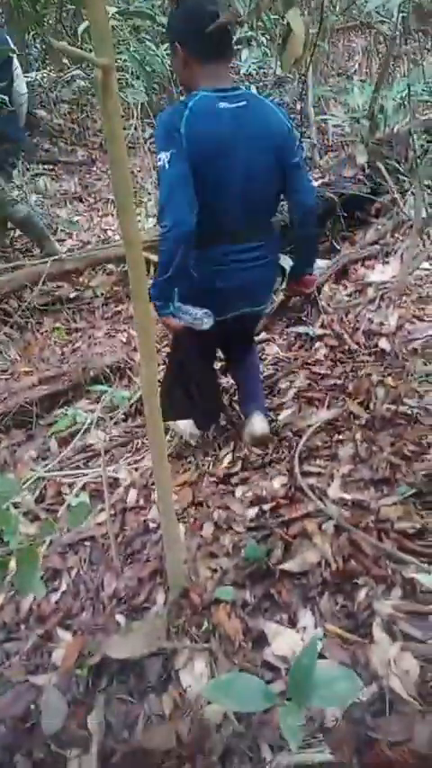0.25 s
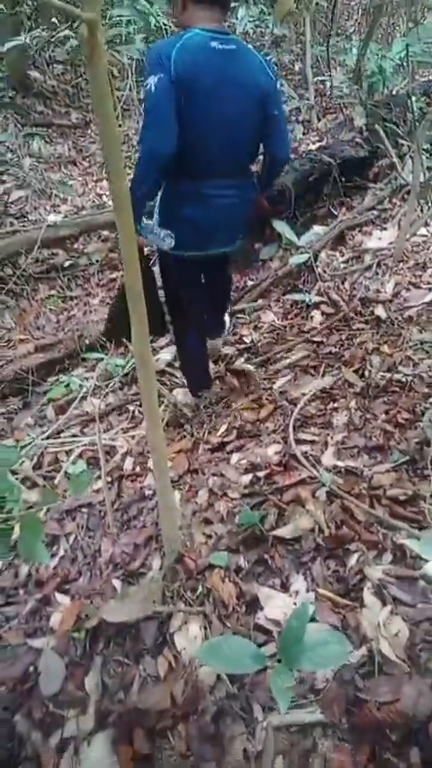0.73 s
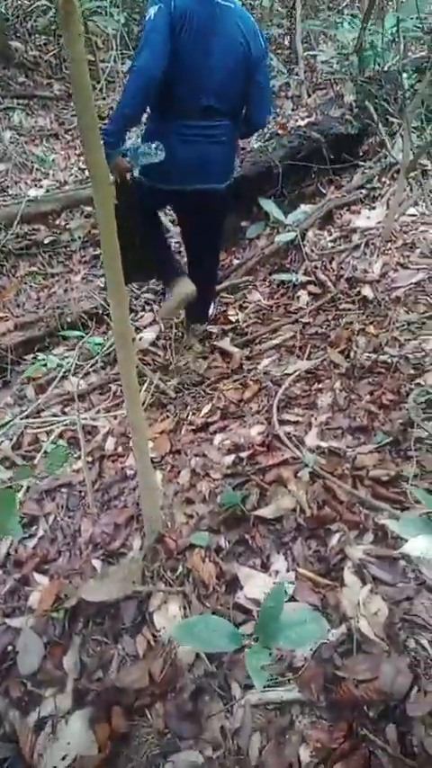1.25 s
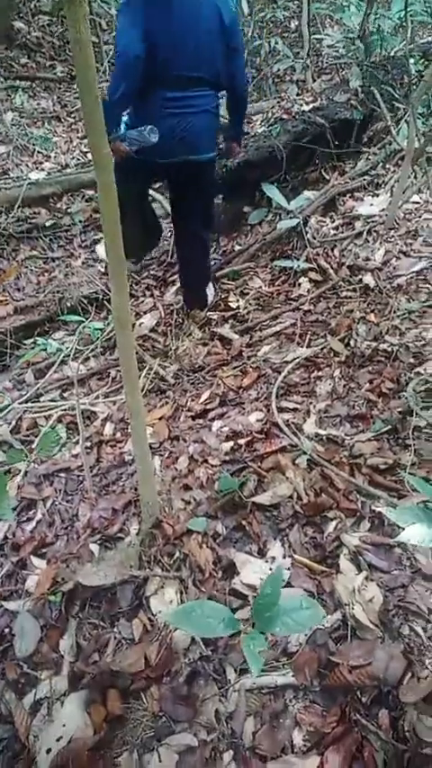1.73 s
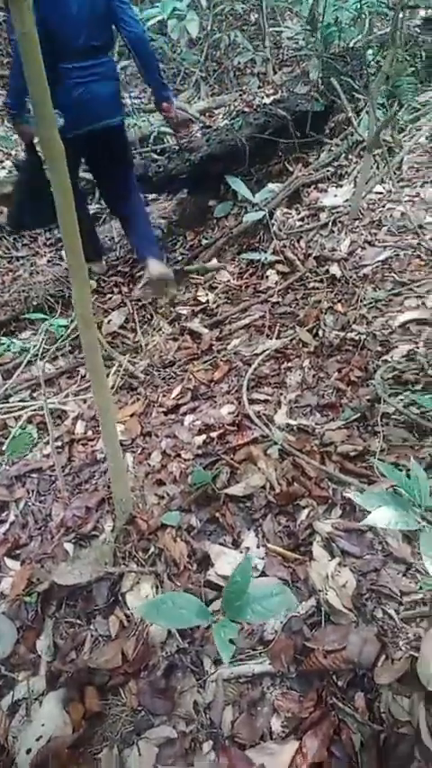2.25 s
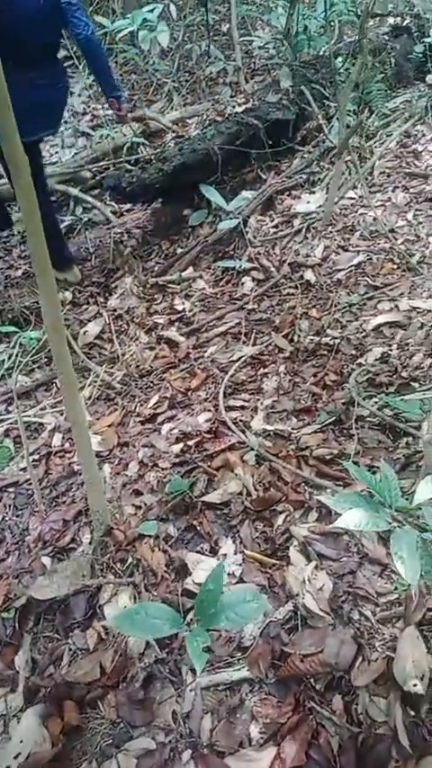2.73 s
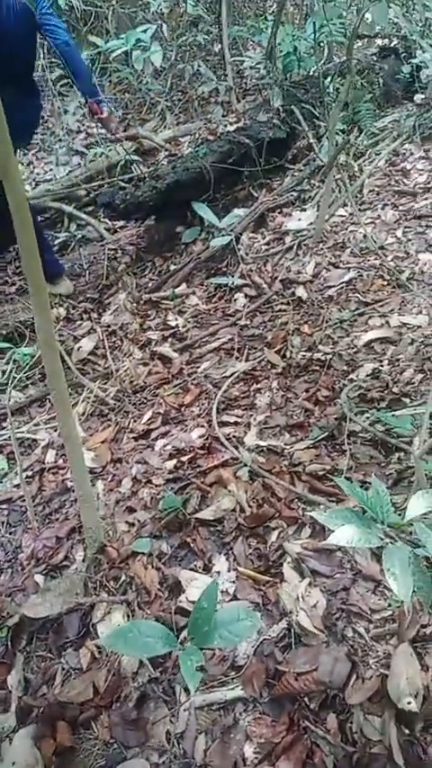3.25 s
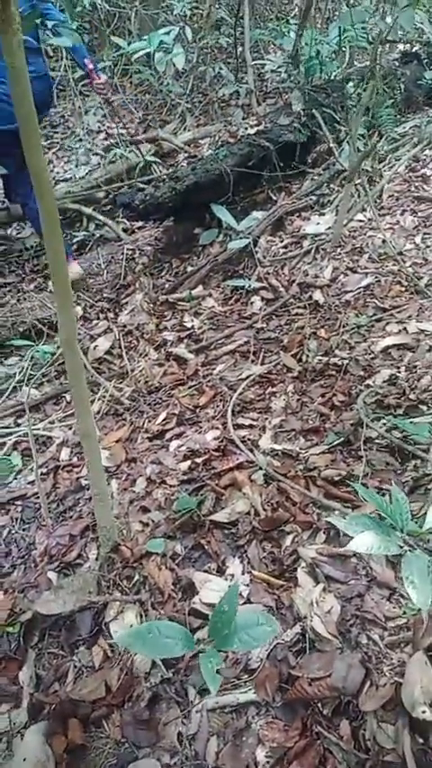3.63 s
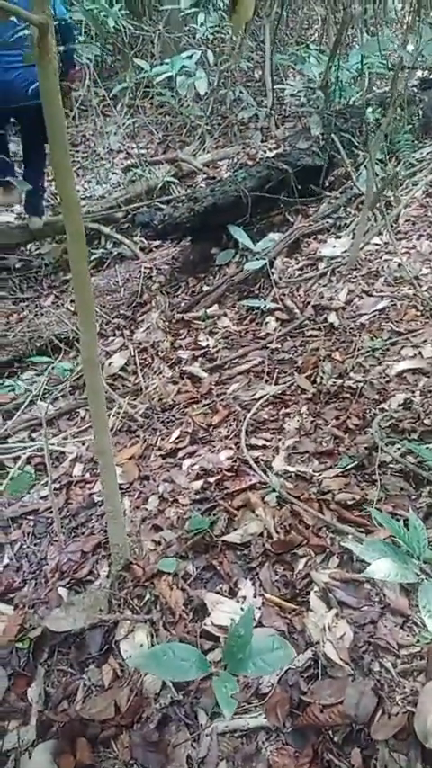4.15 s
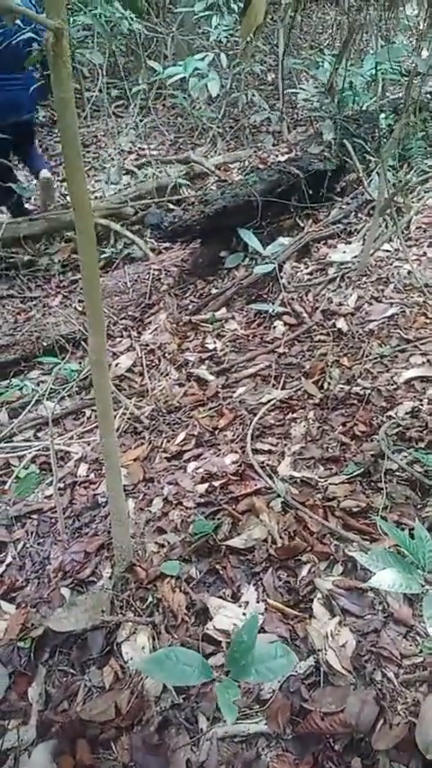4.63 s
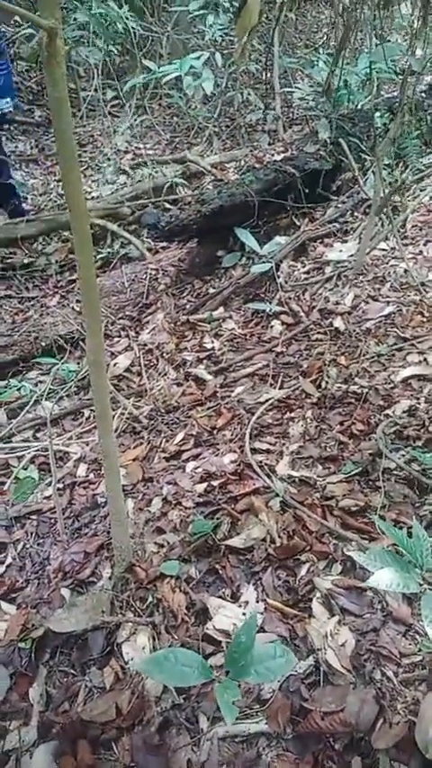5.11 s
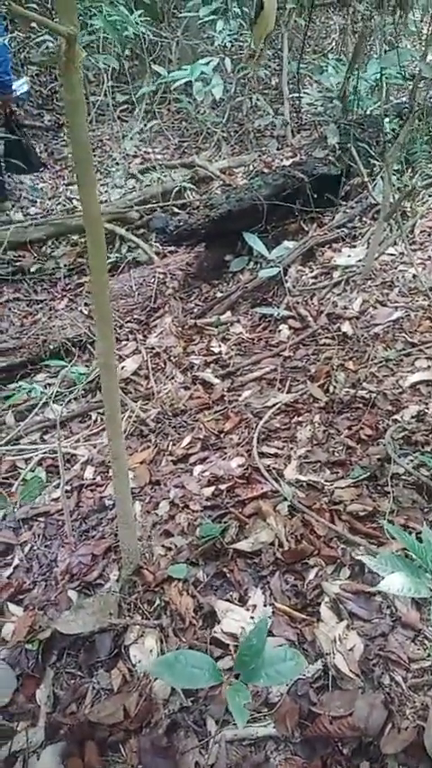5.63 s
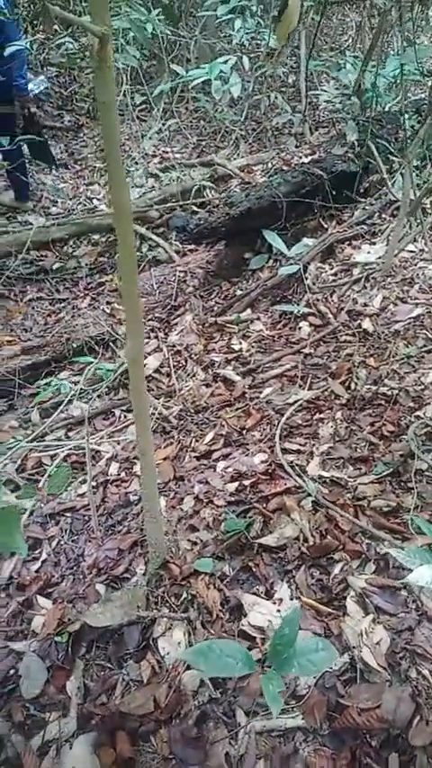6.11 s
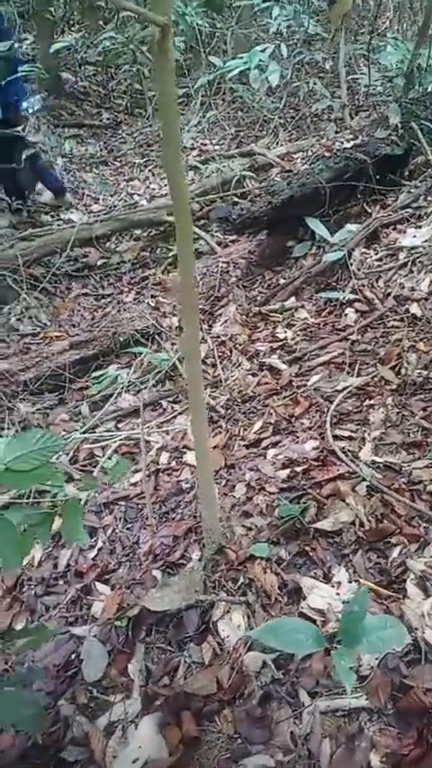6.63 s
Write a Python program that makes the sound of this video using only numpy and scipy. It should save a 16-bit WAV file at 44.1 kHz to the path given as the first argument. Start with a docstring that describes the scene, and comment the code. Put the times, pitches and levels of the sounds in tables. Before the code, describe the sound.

A walker treads dry leaf litter close by, crackling and snapping twigs in the first second, with a low heel thud and crunch soon after. Steps grow sparser and softer as the person moves away among the trees. Two crickets trill high and continuously over distant insects, joined by a gliding whistle and a brief rasp. Handheld outdoor microphone, light woodland echoes.

```python
"""Footsteps in a forest of crickets

Walkers tread dry leaf litter: pressed leaves crackle as dense noise cracks, twigs snap as ringing bursts,
heels thud as sinking low tones, dragged sticks scrape a narrow resonance and a slipping branch creaks once.
Two crickets trill as chopped tones over shaped-noise insects; others whistle in gliding tones or rasp.
Scattered echoes from the trees follow the steps and the trills; patchy treble noise widens the stereo."""
import sys
import numpy as np
from scipy import signal
from scipy.fft import rfft, irfft
from scipy.io import wavfile
from scipy.ndimage import uniform_filter1d

SR = 44100
rng = np.random.default_rng(int(sys.argv[2]) if len(sys.argv) > 2 else 0)


def output_pcm(signal):
    """Save a mono or channel-first signal as 16-bit PCM at the path in sys.argv[1].

    Samples are clipped to [-1, 1] before scaling.
    """
    pcm = np.clip(np.atleast_2d(signal).T, -1, 1) * 32767
    wavfile.write(sys.argv[1], SR, np.round(pcm).astype(np.int16))


N = 302967

# tone colour of dry leaf litter: (frequency [Hz], relative level [dB])
LITTER_COLOUR = [(100, -65.5), (170, -28), (316, -33.5), (408, -30), (862, -20.5), (1390, -20.5),
                 (1600, -12.5), (1760, -20), (2440, -0.5), (3780, -1), (7020, -9.5), (9400, -39),
                 (13300, -27.5)]


def gain_of(db):
    """Amplitude factor of a level in dB."""
    return 10 ** (np.asarray(db) / 20)


def evened(x):
    """Scales a sound to rms 1."""
    return x / np.sqrt(np.mean(x ** 2) + 1e-20)


def read(points, hz):
    """Reads a (frequency, value) curve at hz, along log frequency."""
    f, value = np.transpose(points)
    return np.interp(np.log(hz + 1), np.log(f + 1), value)


def follow(rows, t):
    """Columns of a (time, values) curve table at the times t."""
    s, *columns = np.transpose(rows)
    return [np.interp(t, s, c) for c in columns]


def add(mix, s, sound):
    """Lays a sound into the mix from s seconds on."""
    part = mix[round(s * SR):][:len(sound)]
    part += sound[:len(part)]


def resonate(x, hz, width):
    """A resonance: shifts hz (fixed or gliding) down to zero, smooths, and shifts back."""
    turn = np.exp(2j * np.pi * np.cumsum(hz * np.ones(len(x))) / SR)
    r = np.exp(-np.pi * width / SR)
    smooth = signal.lfilter([1 - r], [1, -r], x / turn + 1e-18)
    return 2 * (turn * smooth).real


def narrow_noise(count, hz, width):
    """Noise through the same resonance three times, rms 1."""
    band = rng.standard_normal(count)
    for _ in range(3):
        band = resonate(band, hz, width)
    return evened(band)


def wander(per_s, count=N):
    """Random drift around zero that turns about per_s times a second, from knots evened to rms 1."""
    knots = rng.standard_normal(int(N / SR * 60) + 2)
    knots = evened(uniform_filter1d(knots, max(1, round(60 / per_s))))
    return np.interp(np.arange(count) / SR * 60, np.arange(len(knots)), knots)


def patches(shape, size):
    """Random blobs over frequency and time, rms 1."""
    across_hz = uniform_filter1d(rng.standard_normal(shape), size[0], 0)
    return evened(uniform_filter1d(across_hz, size[1], 1))


def leaves():
    """Dense cracks of uneven size; each footfall presses them louder and colours them deep or fine."""
    # footfalls: (full weight [s], press down [s], ease off [s], pressure [dB],
    #             deep crush [dB, -13.5 is neutral], fine rustle [dB, -22 is neutral])
    steps = [(.07, 0.2, 0.44, -30.5, -3.5, -12.5), (.17, 0.075, 0.34, -31.5, 5, -9.5),
             (0.254, 0.048, 0.2, -26, 3, -13), (.73, 0.048, 0.57, -34, -9.5, -13),
             (.85, 0.048, 0.042, -28.5, -15, -8), (.98, 0.085, 0.04, -42.5, -12, -1),
             (1.15, 0.22, .3, -39, -11, -13.5), (1.235, 0.049, .12, -33.5, -6.5, -11),
             (1.68, 0.025, 0.033, -26.5, 2, -10), (2.094, 0.03, 0.34, -31, -1, -16),
             (2.2, 0.13, 0.09, -36.5, -18, -10), (2.64, 0.3, 0.14, -47, -25, -11.5),
             (2.97, 0.079, 0.3, -39, -1, -15), (3.029, 0.11, 0.1, -37.5, 1.5, -7.5),
             (3.9, 0.26, 0.38, -47, -4, -12), (4.12, .16, 0.11, -39, -11, -13.5),
             (4.199, 0.023, 0.026, -39.5, -15, -40), (4.5, 0.048, 0.16, -28.5, -1, -12),
             (4.78, 0.1, 0.091, -46, -6.5, -4.5), (4.992, 0.073, 0.13, -37, 1.5, -7),
             (5.15, .05, 0.12, -46, 2.5, -1.5), (5.6, 0.033, 0.092, -55, -22.5, 11),
             (6.07, 0.041, 0.073, -46, -8, -19), (6.369, 0.1, 0.41, -54, 3, -4),
             (6.475, .025, 0.23, -38, -2.5, -5), (6.72, 0.2, 0.35, -42, 1, -8.5),
             (6.85, 0.14, .3, -43.5, 5, -13)]
    # the litter never quite rests: pressure, deep crush and fine rustle [dB, as above]
    stir = (-63.5, -19, -5.5)
    press_db = 20  # a step swells and fades by this much over its times
    deep_haste = 1.99  # the deep crush comes and goes this many times as fast

    crack_sizes = gain_of(3.5 * np.minimum(rng.exponential(1, N), 4))
    cracks_now = crack_sizes * (rng.random(N) < 1500 / SR)  # about 1500 cracks per s
    drive = evened(cracks_now * rng.choice([-1., 1.], N)) + 0.98 * rng.standard_normal(N)
    drive = drive * gain_of(2.1 * wander(45.))  # cracks come in clumps
    hz, t, z = signal.stft(drive, SR, nperseg=512, noverlap=384)
    deep = np.clip(np.log(2300 / (hz + 1)) / 0.5, 0, 1)[:, None]
    fine = np.clip(np.log((hz + 1) / 5000) / 0.64, 0, 1)[:, None]

    def power(db, deep_db, fine_db):
        """Power over frequency and time of one press on the leaves."""
        return gain_of(deep * (deep_db + 13.5) + fine * (fine_db + 22)) ** 2 * gain_of(db) ** 2

    weight = power(*stir) * np.ones(len(t))
    for s, press, ease, db, deep_db, fine_db in steps:
        away = np.where(t < s, (s - t) / press, (t - s) / ease)
        deep_now = deep_db - press_db * (deep_haste - 1) * away
        weight = weight + power(db - press_db * away, deep_now, fine_db)
    # narrow random streaks, about a tenth of a second long, colour the noise
    colour_db = read(LITTER_COLOUR, hz)[:, None] + 4.5 * patches(z.shape, size=(2, 28))
    return signal.istft(z * gain_of(colour_db) * np.sqrt(weight), SR, nperseg=512, noverlap=384)[1][:N]


def chorus():
    """Far insects and air blur into patchy noise."""
    # tone colour of the chorus: (frequency [Hz], relative level [dB])
    chorus_colour = [(40, -13), (170, -22.5), (490, -25.5), (1750, -20), (1950, -8.5), (2300, -10),
                     (4040, -12.5), (4900, -24), (6100, -28), (7800, -19), (9500, -20.5), (11300, -35),
                     (12300, -34.5), (13000, -25.5)]
    chorus_db = -61
    hz, t, z = signal.stft(rng.standard_normal(N), SR, nperseg=1024, noverlap=768)
    narrow = 2.8 * patches(z.shape, size=(4, 20))
    broad = 2.4 * patches(z.shape, size=(60, 6))
    z = z * gain_of(read(chorus_colour, hz)[:, None] + narrow + broad)
    return gain_of(chorus_db) * evened(signal.istft(z, SR, nperseg=1024, noverlap=768)[1][:N])


def crickets():
    """Each wing tone is chopped into even strokes, which spreads it into a comb of lines."""
    # wing tones of two near crickets: (time [s], higher one [Hz], lower one [Hz])
    wings = [(0, 5615, 5445), (1.0, 5612, 5445), (1.7, 5599, 5430), (3.1, 5611, 5434), (5.3, 5627, 5490),
             (6.87, 5629, 5507)]
    # strokes quicken with the tone: (wing tone [Hz], stroke rate there [per s], added rate [per s per Hz])
    stroke_rates = [(5615, 58, .4), (5460, 60.5, .02)]
    # trill levels before blend and mix: (time [s], higher one [dB], lower one [dB])
    trill = [(0, -52, -48), (.6, -51, -54), (1.3, -48.5, -55.5), (1.7, -49, -48), (2.1, -51, -55.5),
             (2.35, -47, -48.5), (2.8, -52, -53.5), (3.2, -57, -48), (3.7, -47.5, -61), (4.3, -53, -55.5),
             (4.65, -48.5, -52.5), (5.4, -49.5, -55), (6.2, -54.5, -52.5), (6.87, -54, -52)]
    t, song = np.arange(N) / SR, 0
    # the strokes favour the lines above the wing tone by the share lean
    for hz, (at_hz, rate, slope), db, lean in zip(follow(wings, t), stroke_rates, follow(trill, t), (.8, .2)):
        strokes = rate + slope * (hz - at_hz)
        turn = 2 * np.pi * (np.cumsum(strokes + 0.313 * wander(1.28)) / SR + rng.random())
        wing = 2 * np.pi * np.cumsum(hz + 3.01 * wander(2.28)) / SR
        stroke_shape = np.exp(1.5 * (np.cos(turn) + 1j * lean * np.sin(turn)))
        near = evened((stroke_shape * np.exp(1j * wing)).imag) * gain_of(1.8 * wander(6.0))
        far = resonate(rng.standard_normal(N), hz + 30, 260)
        far = evened(resonate(far, hz + 30, 260))
        song = song + gain_of(db - 1.0) * (near + 0.68 * far)
    hz = np.fft.rfftfreq(N, 1 / SR)
    return irfft(rfft(song) / (1 + ((hz - 5575) / 215) ** 8), N)  # wings radiate one narrow band


def drones():
    """Two high insect bands swell on their own; a hiss sits at the very top; two thin drones hold."""
    # swelling bands: (centre [Hz], width [Hz])
    high_bands = [(6824, 580), (6326, 103)]
    # their swells: (time [s], first band [dB], second band [dB])
    high_swells = [(0, -70, -71), (.5, -57, -54.5), (1.7, -57, -53.5), (2.8, -55.5, -59), (3.8, -57.5, -62),
                   (6.3, -57.5, -71), (6.7, -73, -60)]
    # hiss at the very top: (time [s], level [dB])
    hiss_curve = [(0, -68), (2.5, -78), (4, -69), (5.3, -70), (6, -71), (6.87, -62)]
    # thin drones: (centre [Hz], width [Hz], level [dB])
    steady_bands = [(1945, 110, -70.5), (11840, 500, -77.5)]
    t, out = np.arange(N) / SR, 0
    for (hz, width), db in zip(high_bands, follow(high_swells, t)):
        out = out + narrow_noise(N, hz, width) * gain_of(db + 1.2 * wander(27.0))
    hiss_db = follow(hiss_curve, t)[0] + 2.24 * wander(10.0)
    out = out + narrow_noise(N, 12710, 900) * gain_of(hiss_db)
    for hz, width, db in steady_bands:
        out = out + narrow_noise(N, hz, width) * gain_of(db + 2.2 * wander(4.0))
    return out


def widening_noise(x):
    """Patchy random-phase treble noise, opposite in sign left and right, widens the stereo."""
    # share of the source: (frequency [Hz], level re the source [dB])
    width_curve = [(3800, -61.5), (4400, -44), (5500, -26), (7000, -9), (13000, -4.5)]
    hz, t, z = signal.stft(x, SR, nperseg=512)
    z = abs(z) * np.exp(2j * np.pi * rng.random(z.shape))  # random phases
    z = z * gain_of(read(width_curve, hz)[:, None] + 9.0 * patches(z.shape, size=(40, 8)))
    return signal.istft(z, SR, nperseg=512)[1][:N]


def trees(x):
    """Scattered echoes from trunks, each band dying at its own speed."""
    # echo decay: (frequency [Hz], time to fall 60 dB [s])
    echo_decay = [(300, 0.21), (1000, 0.17), (3000, 0.36), (8000, 0.69)]
    taps = np.zeros(SR // 2)
    at = np.arange(200, len(taps) - 20, 20)
    taps[at + rng.integers(0, 20, len(at))] = rng.choice([-1., 1.], len(at))
    hz, t, z = signal.stft(taps, SR, nperseg=256)
    tail = signal.istft(z * gain_of(-60 * t / read(echo_decay, hz)[:, None]), SR, nperseg=256)[1]
    return signal.fftconvolve(x, tail / np.linalg.norm(tail))[:N]


def scrapes():
    """Fluttering friction of dragged leaves and sticks rings one narrow resonance each."""
    # curled leaves and sticks: (start [s], length [s], pitch [Hz], level [dB])
    drags = [(.05, 0.032, 1590, -69), (0.323, 0.12, 1260, -62), (0.708, 0.063, 793, -57.5),
             (1.13, 0.23, 844, -60.5), (2.542, 0.036, 1480, -60), (3.545, 0.058, 3430, -54.5),
             (3.857, 0.11, 1440, -60), (3.876, 0.093, 970, -64.5), (3.877, .11, 2780, -59),
             (4.03, 0.13, 1380, -61.5), (4.043, 0.11, 995, -68.5), (4.441, .13, 790, -60.5),
             (4.735, .06, 1440, -65), (4.747, 0.058, 3370, -60), (4.932, 0.1, 760, -58),
             (4.938, 0.098, 1390, -56.5), (4.944, 0.088, 2555, -51), (6.335, 0.068, 770, -62.5),
             (6.456, 0.091, 840, -66)]
    out = np.zeros(N)
    for s, length, hz, db in drags:
        count = round(length * SR)
        ringing = narrow_noise(SR // 2, hz, 194)[-count:]
        rub = ringing * gain_of(db + 2.0 * wander(40., count=count))
        add(out, s, rub * signal.windows.tukey(count, .6))
    return out


def snaps():
    """Breaking twigs and stiff leaves: a short dull knock and a burst of splinters that dies away."""
    # breaks: (time [s], level [dB], ring [Hz], bright part [dB re level], dull knock [dB re level])
    breaks = [(0.0574, -37.5, 3920, -15, -12), (0.156, -37.5, 3770, -1.5, -7), (0.174, -30.5, 3860, -8, 5),
              (0.2014, -43, 3280, -24, 18), (0.236, -33, 2440, -8, 15), (0.2469, -27, 3700, -12, -22),
              (0.2608, -31, 4160, -2.5, 7), (0.7105, -32, 3110, -50, -5), (0.8256, -42, 4180, -20, -24),
              (0.8388, -41, 4420, -25, -22), (0.97, -49, 3730, -19, -22), (1.2188, -40, 2750, -23.5, 8),
              (1.6657, -29, 2830, -36, 16.5), (2.0646, -43, 3210, 20, 22), (2.145, -40.5, 2870, 2.5, 17),
              (2.2168, -52, 3070, -21, -27), (2.6411, -48.5, 3550, -35, -18), (2.9586, -41, 3550, -29, -8),
              (2.9845, -38, 2670, -31, 4), (3.0199, -39.5, 3010, -11, -8), (3.462, -51, 4160, -8, -11),
              (4.0413, -49.5, 3520, -21, -19), (4.1816, -41.5, 2950, -43, -26),
              (4.339, -50, 2450, -27, -15), (4.4748, -53, 3100, -18, 18.5), (4.4888, -30.5, 4130, -3, 12),
              (4.9587, -49, 2450, -6, -9), (5.1292, -59.5, 1970, 4, 22.5), (6.4485, -36, 4420, -16, 12),
              (6.4525, -46.5, 2900, 17, -5.5), (6.676, -54, 1500, -3, 11), (6.6885, -34.5, 3760, -5, 4),
              (6.83, -46.5, 4000, 5.5, 11)]
    splinter_t60_s = 0.12
    out, t = np.zeros(N), np.arange(5000) / SR
    litter = gain_of(read(LITTER_COLOUR, np.fft.rfftfreq(len(t), 1 / SR)))
    rise = 1 - np.exp(-t / 0.0014)
    # the first burst is over sooner
    dying = gain_of(-60 * t / splinter_t60_s) * (1 + 0.74 * np.exp(-t / 0.0033))
    for s, db, hz, bright_db, dull_db in breaks:
        grit = rng.standard_normal(len(t))
        splinter = 0.93 * evened(irfft(rfft(grit) * litter))
        rings = (hz, 0.28 * hz, 0), (7000, 1800, bright_db), (12700, 1200, bright_db - 4.5)
        for ring_hz, width, ring_db in rings:
            ring = resonate(resonate(grit, ring_hz, width), ring_hz, width)
            splinter = splinter + gain_of(ring_db) * evened(ring)
        knock = np.sin(2 * np.pi * 850 * t) * gain_of(dull_db - 60 * t / 0.01)
        add(out, s, gain_of(db) * rise * (knock + splinter * dying))
    return out


def cracks():
    """The sharp first crack of dry wood giving way: a few cycles under a very short bell curve."""
    # cracks: (time of centre [s], level [dB], pitch [Hz])
    wood_cracks = [(.1585, -18, 4500), (.2388, -20, 2910), (.2513, -15, 3040), (.8285, -19.5, 3190),
                   (.8388, -17, 3980), (.8564, -19.5, 3660), (.9702, -23.5, 4070), (1.2191, -23, 3620),
                   (2.0655, -10, 7470), (2.1466, -19, 2950), (2.2182, -25, 2930), (4.4905, -11.5, 3730),
                   (6.1537, -42, 1800), (6.4500, -22, 4200), (6.4535, -19, 5000), (6.6907, -15, 3810)]
    out, t = np.zeros(N), np.arange(-100, 100) / SR
    for s, db, hz in wood_cracks:
        cycles = 1.0 + hz / 7000
        bell = np.exp(-(t * hz / cycles) ** 2)
        add(out, s + t[0], gain_of(db) * np.cos(2 * np.pi * hz * t + 1) * bell)
    return out


def thuds():
    """Heels on soil and wood: a damped low swing of the ground with a rough knock above it."""
    # heels: (time [s], level before decay [dB], starting pitch [Hz], knock [dB re level, 3 dB added below])
    heels = [(0.195, -40, 277, -11), (1.659, -18.5, 254, -29), (2.141, -47.5, 172, 6.5),
             (2.35, -58, 246.4, -25), (2.997, -52.5, 138, 1.5), (3.182, -56.5, 248, -11),
             (4.481, -65, 230, 15), (5.018, -55, 144, -21), (5.124, -60, 150, 4), (6.15, -42, 177, -2.5),
             (6.674, -43, 198, 0), (6.714, -50.5, 260, -2), (6.767, -51, 200, -22)]
    t60_s, knock_hz = 0.095, 480
    sag, sag_s = .55, .016  # the swing sinks by this share of its pitch, with this time constant
    hold_s, drop_db = .026, -9.5  # the heel stays down this long, then the level drops
    out, t = np.zeros(N), np.arange(9000) / SR
    rise = 1 - np.exp(-t / 0.004)
    drop = drop_db * np.clip(t / hold_s - 1, 0, .25) * 4  # complete a quarter of the hold later
    for s, db, hz, knock_db in heels:
        sinking = hz * (1 - sag * (1 - np.exp(-t / sag_s)))
        swing = np.sin(2 * np.pi * np.cumsum(sinking) / SR) + .5 * narrow_noise(len(t), sinking, 150)
        knock = np.sin(2 * np.pi * knock_hz * t) + .5 * narrow_noise(len(t), knock_hz, 710)
        thud = swing + knock * gain_of(knock_db + 3.0 - 60 * t / 0.1)
        add(out, s, thud * rise * gain_of(db - 60 * t / t60_s + drop))
    return out


def whistler():
    """Gliding tones that break into beads; a fast flutter sets a weak line on either side."""
    # whistles: (start [s], length [s], first pitch [Hz], last pitch [Hz], first level [dB], last level [dB])
    whistles = [(1.384, 0.92, 2912, 3042, -44.5, -49), (2.225, 0.46, 5330, 5210, -52, -55),
                (3.856, .12, 3020, 3065, -45.5, -44.5), (5.96, .47, 2830, 2966, -61, -50)]
    rise_s, fall_s = 0.13, .04
    out = np.zeros(N)
    for s, length, first_hz, last_hz, first_db, last_db in whistles:
        t = np.arange(0, length, 1 / SR)
        count = len(t)
        hz = first_hz + (last_hz - first_hz) * t / length
        db = first_db + (last_db - first_db) * t / length
        swell = np.clip(np.minimum(t / min(rise_s, length / 4), (length - t) / fall_s), 0, 1)
        flutter = 1 + 0.17 * np.cos(2 * np.pi * 285 * t)
        bead_phase = np.cumsum(14 + 11.0 * wander(12.0, count=count)) / SR % 1
        beads = 1 - 0.73 * np.exp(-((bead_phase - .5) / 0.097) ** 2)  # a dip between beads
        tone = np.sqrt(2) * np.sin(2 * np.pi * np.cumsum(hz + 8.9 * wander(25., count=count)) / SR)
        add(out, s, tone * flutter * beads * swell * gain_of(db + 2.2 * wander(20., count=count)))
    return out


def chatter():
    """A raspy insect calls briefly: short uneven bursts of noise, each in its own band."""
    # rasps: (start [s], length [s], centre [Hz], level before the swell [dB])
    rasps = [(3.1, 0.21, 5540, -49.5), (3.26, 0.23, 5900, -46.5), (3.44, 0.27, 5550, -51)]
    out = np.zeros(N)
    for s, length, hz, db in rasps:
        count = round(length * SR)
        rasp = resonate(resonate(rng.standard_normal(count), hz, 700), hz, 700)
        add(out, s, evened(rasp) * np.hanning(count) * gain_of(db + 2.7 * wander(35., count=count)))
    return out


def creak():
    """A branch under load: even slips of bark on bark ring the wood."""
    # wood resonances: (centre [Hz], width [Hz], level [dB])
    wood_modes = [(413, 55, 8), (840, 97, -1), (1270, 240, -8)]
    loudest_s, loudest_db, slips_per_s = 5.796, -53.5, 219.5
    rise_s, fall_s = .07, 0.024  # to and from 40 dB below
    out, t = np.zeros(N), np.arange(-rise_s, fall_s, 1 / SR)
    db = loudest_db - 40 * np.maximum(-t / rise_s, t / fall_s)
    clicks = np.diff(np.floor(slips_per_s * (t - t[0])), prepend=0)
    wood = sum(gain_of(level_db) * resonate(clicks, hz, width) for hz, width, level_db in wood_modes)
    add(out, loudest_s + t[0], gain_of(db) * evened(wood))
    return out


def scene():
    """Mixes steps, insects and echoes; added random-phase treble noise opens the stereo width."""
    bed, song = leaves() + chorus(), crickets()
    high = drones()
    ground = bed + scrapes() + snaps() + cracks() + thuds() + creak()
    song = 0.72 * song + 0.81 * trees(song)  # echoes smear the wing strokes
    mono = ground + gain_of(-12.5) * trees(ground) + song + chatter() + whistler() + high
    side = widening_noise(bed + high)
    return np.array([mono + side, mono - side])


def record(dry):
    """The microphone drops deep bass; then a steep low-pass limits the band."""
    edge_hz = 13150
    dry = signal.sosfilt(signal.butter(4, 100, "high", fs=SR, output="sos"), dry)
    low_pass = signal.firwin(511, edge_hz, window=("kaiser", 9), fs=SR)
    return signal.oaconvolve(dry, low_pass[None], "same")


dry = scene()
out = record(dry)
output_pcm(out)
```